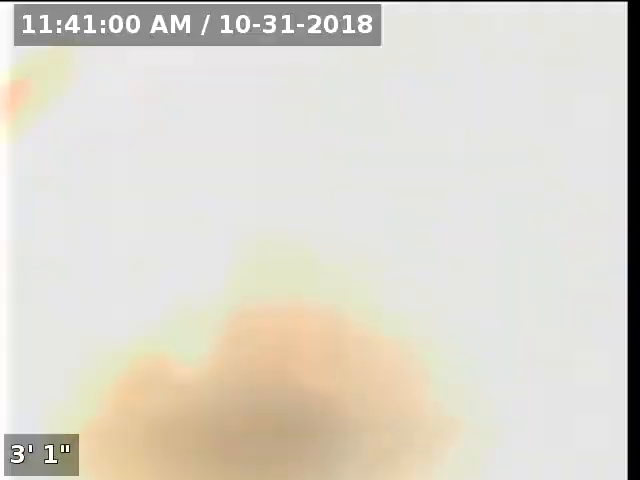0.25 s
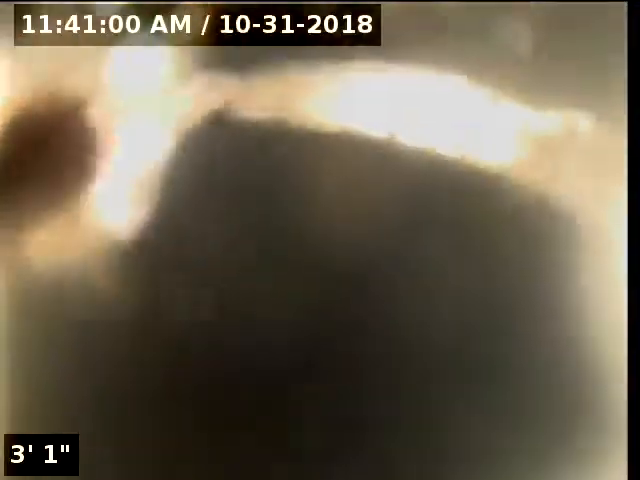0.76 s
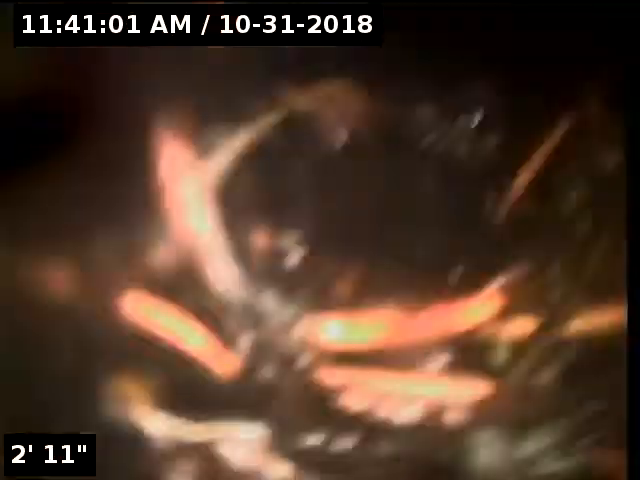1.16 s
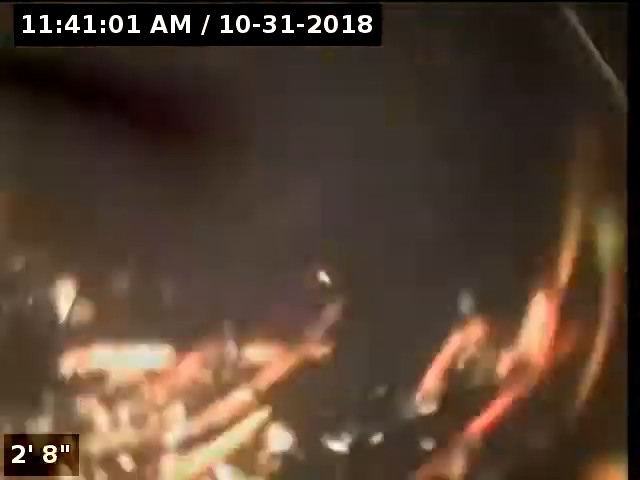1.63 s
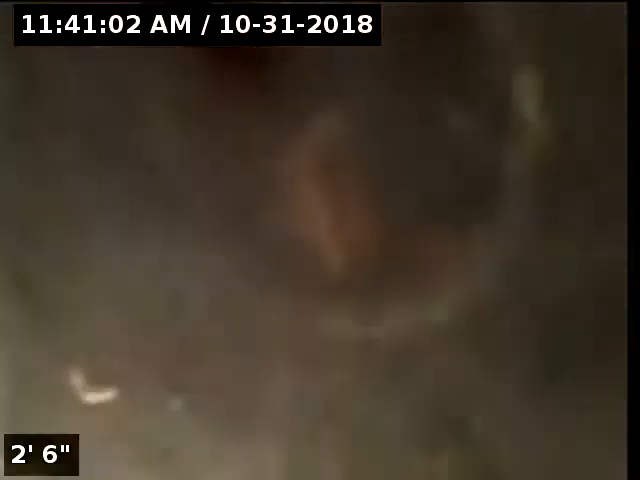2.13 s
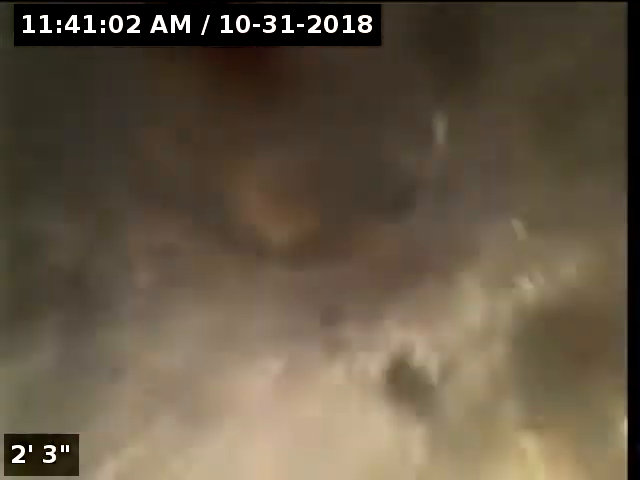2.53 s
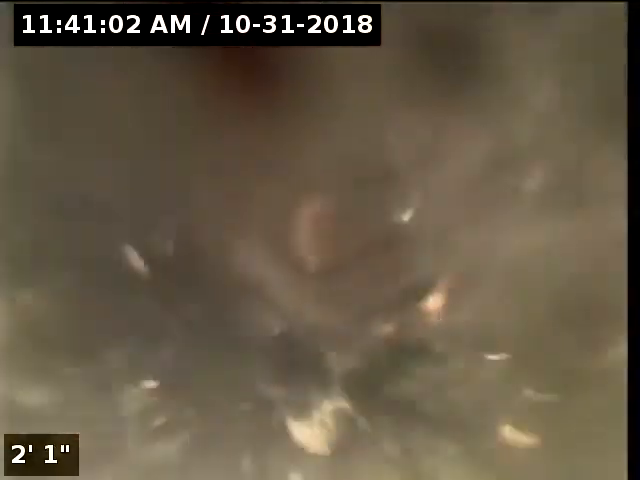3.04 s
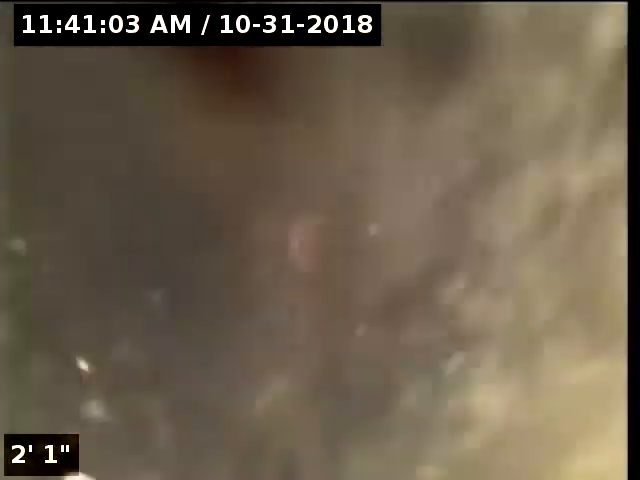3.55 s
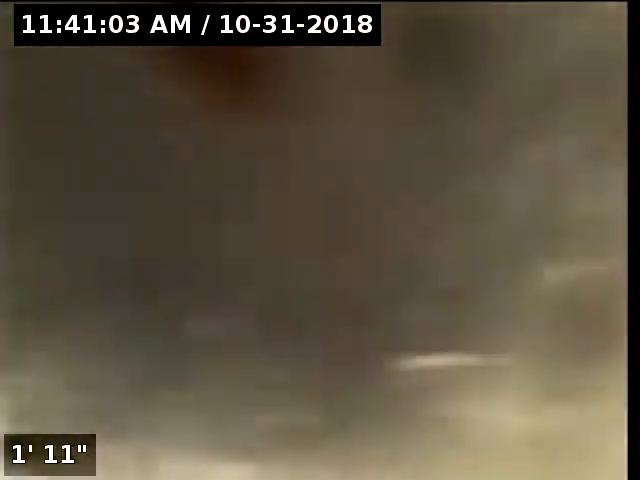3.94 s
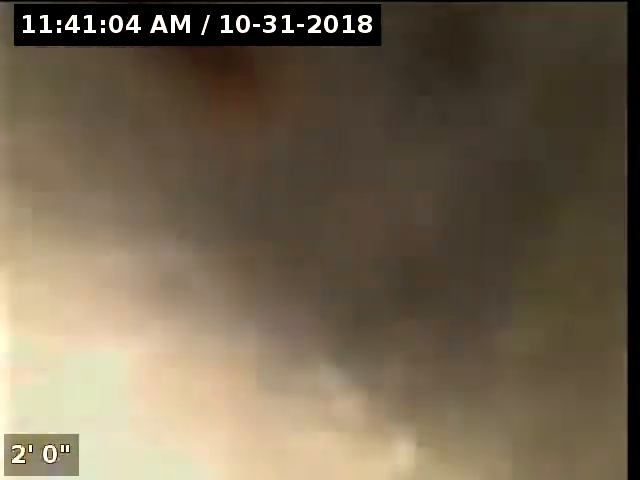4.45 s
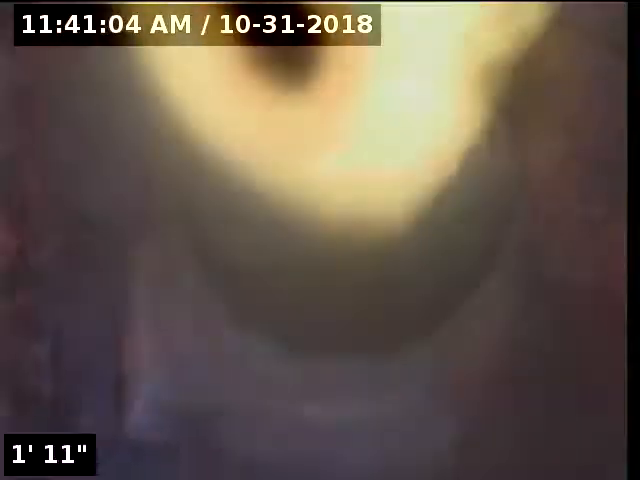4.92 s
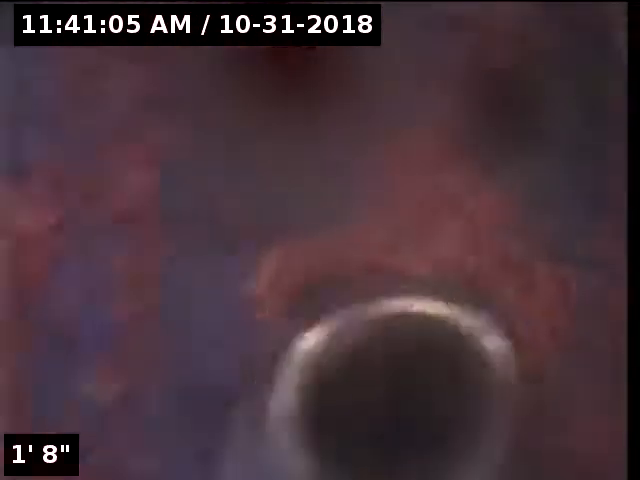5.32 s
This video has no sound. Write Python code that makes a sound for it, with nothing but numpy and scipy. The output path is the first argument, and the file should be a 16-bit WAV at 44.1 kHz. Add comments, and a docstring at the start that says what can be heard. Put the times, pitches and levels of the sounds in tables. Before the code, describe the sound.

A stiff camera cable is pulled quickly up a narrow vent pipe, scraping in uneven, hollow surges. Hard knocks and a scratchy rustle come at the start, followed by more scattered knocks and lighter slaps on the wall. Later come one sharp tick and a brief faint judder before the last pulls. The small, close microphone sounds dull and overloads on the knocks, with a low rumble and faint hiss underneath.

```python
"""A stiff camera push cable scrapes along a narrow vent pipe as it is pulled quickly back up.
Friction excites the pipe's resonances with each pull. Now and then the cable slaps the wall or knocks
hard; each knock rings damped modes, arrives as a tight cluster of echoes and overloads the small, dull
microphone. Scratchy rustles sound close by, there is one sharp tick, and the cable judders once in
stick-slip as it slows. A low rumble and faint hiss lie underneath."""
import sys
import numpy as np
from scipy import signal
from scipy.fft import rfft, irfft, next_fast_len
from scipy.io import wavfile

SR = 44100
rng = np.random.default_rng(int(sys.argv[2]) if len(sys.argv) > 2 else 0)


def dump_mix(stems):
    """Bounce the given channels to the path in sys.argv[1] as a 16-bit WAV at rate SR."""
    frames = np.atleast_2d(stems).T  # one column per channel
    limited = np.clip(frames, -1, 1)  # hard clip at full scale
    pcm = np.round(limited * 32767).astype(np.int16)
    wavfile.write(sys.argv[1], SR, pcm)


N = 246068
TIME = np.arange(N) / SR


def from_db(db):
    """Amplitude ratio: tenfold for every 20 dB."""
    return np.exp(np.asarray(db) * (np.log(10) / 20))


def unit_rms(x):
    """Normalisation to unit mean power."""
    return x / np.sqrt(np.mean(x ** 2) + 1e-20)


def butter(x, hz, kind, order=2):
    """Maximally flat low- or high-pass filtering."""
    return signal.sosfilt(signal.butter(order, hz, kind, fs=SR, output="sos"), x + 1e-18)


def coloured(x, spectrum):
    """Spectral shaping to an envelope that rolls off beyond both ends; unit power."""
    hz, db = np.transpose(spectrum)
    size = next_fast_len(N)
    f = np.maximum(np.fft.rfftfreq(size, 1 / SR), 1)
    gain = from_db(np.interp(np.log(f), np.log(hz), db))
    roll_off = np.minimum(1, hz[-1] / f) ** 2 * np.minimum(1, f / hz[0])
    return unit_rms(irfft(rfft(x, size) * gain * roll_off, size)[:N])


# background spectra: (frequency [Hz], spectral level [dB])
RUMBLE_SPECTRUM = [(20, -26), (45, -27), (70, -10), (95, -2.5), (130, -4.5), (200, -20.5), (500, -18),
                   (1500, -54)]
HISS_SPECTRUM = [(500, -10.5), (2000, 0.5), (3000, -4), (4000, -4), (5200, -3.5), (6400, -2.5),
                 (7400, -5.5), (8500, -16.5)]

def background():
    """Stationary random noise: a low rumble and microphone hiss."""
    rumble = from_db(-51) * coloured(rng.standard_normal(N), RUMBLE_SPECTRUM)
    hiss = from_db(-67) * coloured(rng.standard_normal(N), HISS_SPECTRUM)
    return rumble + hiss


def resonance(x, hz, width_hz):
    """Forced response of a resonator, with unit gain at its peak."""
    r, w = np.exp(-np.pi * width_hz / SR), 2 * np.pi * hz / SR
    return signal.lfilter(np.array([1, 0, -1]) * (1 - r * r) / 2, [1, -2 * r * np.cos(w), r * r], x)


def slips(per_s, spread_db):
    """Friction as shot noise: tiny slips of uneven size at random moments."""
    sizes = from_db(spread_db * np.minimum(rng.exponential(1, N), 4)) * rng.choice([-1, 1], N)
    return sizes * (rng.random(N) < per_s / SR)


# pulls on the cable: (start [s], fastest moment [s], end [s], scrape level [dB],
# relative grit level [dB], relative hollow ring level [dB], relative drone level [dB])
PULLS = [(-.1, .09, 0.53, -34, -12.5, -17, -9), (0.447, 0.52, 0.87, -33.5, -12, -11, -7),
         (0.935, 1.133, 1.45, -34, -5, -8, -8.5), (1.528, 1.622, 1.695, -35, -12.5, -6.5, -5.5),
         (1.852, 2.343, 2.507, -32.5, -8.5, 13, -9.5), (2.52, 2.563, 2.77, -32, -11, 1.5, -6.5),
         (2.71, 2.788, 2.91, -37, -9, 1.5, -16.5), (3.359, 3.6, 3.74, -30, -10, 7, -15),
         (3.73, 3.8, 3.83, -41, -4, -15, 0.5), (3.92, 3.97, 4.02, -41.5, -10.5, -9, -3),
         (4.06, 4.13, 4.3, -44, 0, -13.5, -2.5), (4.345, 4.589, 4.66, -40, -23, -6.5, 0),
         (4.756, 4.953, 5.265, -31, -8.5, 7.5, -14.5), (5.177, 5.31, 5.54, -33, -5.5, -10, -6.5)]

def pull_envelopes(swell_db=4.5, fade_db=5.5, grab_db_per_s=137.5, release_db_per_s=109.5):
    """Friction noise grows with sliding speed: each pull swells to its fastest moment and fades."""
    scrape, grit, drone = [np.full(N, from_db(db)) for db in (-49, -62, -55)]  # creep between pulls
    hollow = np.zeros(N)
    for start, fastest, end, db, grit_db, hollow_db, drone_db in PULLS:
        speed_db = np.interp(TIME, [start, fastest, end], [-swell_db, 0, -fade_db])
        speed_db -= grab_db_per_s * np.clip(start - TIME, 0, 1)
        speed_db -= release_db_per_s * np.clip(TIME - end, 0, 1)
        pull = from_db(db + speed_db)
        scrape = np.maximum(scrape, pull)
        hollow = np.maximum(hollow, from_db(db + hollow_db + 1.8 * speed_db))  # swells more steeply
        grit = np.maximum(grit, pull * from_db(grit_db))
        drone = np.maximum(drone, pull * from_db(drone_db))
    return scrape, hollow, grit, drone


# pipe resonances: (frequency [Hz], bandwidth [Hz], gain [dB])
PIPE_RESONANCES = [(459.8, 14, 2), (744.3, 12, 5.5), (797, 38, -0.5), (620, 45, -4), (1070.4, 29, 3.5),
                   (1313, 140, -2), (1636, 41, 6), (2140, 16, -3)]

def in_pipe(x):
    """Resonance: the pipe reinforces friction noise near its natural frequencies."""
    return unit_rms(x + sum(from_db(db) * resonance(x, hz, width) for hz, width, db in PIPE_RESONANCES))


# friction spectra in the middle, upper and low range: (frequency [Hz], spectral level [dB])
SCRAPE_SPECTRUM = [(200, -49), (270, -19.5), (320, -6), (400, -6.5), (460, -2), (560, -10.5), (640, -8),
                   (780, -9), (880, -16.5), (1000, -14.5), (1300, -41.5)]
GRIT_SPECTRUM = [(600, -27.5), (900, -2.5), (1070, -5), (1280, -2), (1450, -13), (1650, -16.5), (1900, -26),
                 (2200, -17), (2700, -30.5), (3300, -41.5), (4500, -62.5)]
DRONE_SPECTRUM = [(50, -31.5), (90, -10.5), (120, -6.5), (152, 0.5), (172, -13.5), (195, 6), (225, -16),
                  (270, -29), (400, -49)]

def scraping(waver_db=1.08, waver_hz=14):
    """Sliding friction gives a hollow scrape, grit and a drone; uneven grip modulates their level."""
    scrape, hollow, grit, drone = pull_envelopes()
    friction = slips(per_s=7000, spread_db=1.0)
    rub = in_pipe(coloured(friction, SCRAPE_SPECTRUM))
    grip = from_db(waver_db * unit_rms(butter(rng.standard_normal(N), waver_hz, "low")))
    return grip * (from_db(-3.5) * scrape * rub
                   + from_db(-8) * resonance(hollow * rub, hz=736.3, width_hz=14)
                   + from_db(-3.5) * grit * in_pipe(coloured(friction, GRIT_SPECTRUM))
                   + from_db(-3) * drone * coloured(slips(per_s=3500, spread_db=-3.0), DRONE_SPECTRUM))


# rubs near the microphone: (time [s], level [dB], duration [s])
RUBS = [(0.208, -36.5, 0.043), (0.227, -34.5, 0.02), (0.262, -38, 0.017), (0.274, -59, 0.13),
        (0.302, -50, 0.027), (0.442, -61, 0.039), (1.177, -53.5, 0.01), (1.561, -58.5, 0.0071),
        (1.573, -50.5, 0.017), (2.2, -58, 0.011), (4.359, -63, 0.11)]
# their friction spectrum: (frequency [Hz], spectral level [dB])
RUB_SPECTRUM = [(500, -10), (1100, 0.5), (1700, -0.5), (2200, -2), (3000, -6.5), (3600, -6.5), (5000, -6.5),
                (6000, -7), (7500, -14), (8700, -22.5)]
# their thin resonances: (frequency [Hz], bandwidth [Hz], gain [dB])
SQUEAKS = [(1850, 200, 0), (2170, 120, 4), (5976, 40, 2)]

def rustling(judder_rubs, attack_s=0.00061):
    """Short bursts of friction, the judder's among them, excite narrow resonances that squeak."""
    stroke = np.zeros(N)
    for s, db, length in RUBS + judder_rubs:
        age = np.maximum(TIME - s, 0)
        decay = np.exp(-np.minimum(age / length, 10) ** 2)
        stroke += from_db(db) * np.minimum(age / attack_s, 1) * decay
    friction = slips(per_s=3000, spread_db=1.0)
    squeak = unit_rms(sum(from_db(db) * resonance(friction, hz, width) for hz, width, db in SQUEAKS))
    light_stroke = np.minimum(stroke, from_db(-54))  # the squeak stops growing in a hard rub
    return stroke * coloured(friction, RUB_SPECTRUM) + from_db(-1) * light_stroke * squeak


def contacts(rows):
    """Impact force pulses: the softer the contact, the longer the pulse and the lower its cutoff."""
    force, click = np.zeros(N), signal.unit_impulse(SR // 20)
    for s, db, cutoff_hz in rows:
        force[round(s * SR):][:len(click)] += from_db(db) * butter(click, cutoff_hz, "low")
    return force


def ring(x, hz, t60):
    """Free vibration of a damped mode: an impulse starts a sine that falls 60 dB in t60 seconds."""
    r, w = 1000 ** (-1 / (t60 * SR)), 2 * np.pi * hz / SR
    return signal.lfilter([0, r * np.sin(w)], [1, -2 * r * np.cos(w), r * r], x + 1e-18)


def echoed(x, paths):
    """Superposition of delayed, scaled copies."""
    return sum(from_db(db) * np.interp(TIME - delay, TIME, x, left=0) for delay, db in paths)


def reverberation(x, t60, cutoff_hz, build_s=0.0079):
    """Diffuse reflections form a dull tail that builds up and decays exponentially."""
    t = TIME[:SR // 2]
    envelope = from_db(-60 * t / t60) * np.minimum(t / build_s, 1) ** 2
    tail = envelope * butter(rng.standard_normal(len(t)), cutoff_hz, "low")
    return signal.fftconvolve(x, tail / np.sqrt(np.sum(tail ** 2)))[:N]


# hard blows of the cable: (time [s], level [dB], contact cutoff [Hz], extra low-mode level [dB])
KNOCKS = [(0.2224, 2, 2140, 2.5), (.257, -13, 2200, -26), (.563, 1.5, 2000, -0.5), (1.396, 0.2, 1960, 3),
          (1.6919, 2, 2182, 3), (2.298, -18.5, 1200, -6), (2.609, 1.5, 2100, 1), (4.1809, .5, 1960, 3),
          (5.2083, -8.5, 2140, 4)]
# modes a knock excites: (frequency [Hz], level [dB], 60 dB decay time [s])
KNOCK_MODES = [(151.3, -19.5, 0.19), (196.4, -29, 0.39), (220.6, -26, 0.093), (337, -44.5, 0.097),
               (377, -37.5, 0.39), (450.7, -30.5, 0.18), (490, -32, 0.085), (637, -16.5, 0.12),
               (728.5, -13.5, 0.06), (792, -13.5, 0.026), (856, -30, 0.034), (914, -24, 0.21),
               (1036, -25.5, 0.048), (1085, -27.5, 0.045), (1311, -32.5, 0.058), (1625, -50.5, 0.14),
               (2170, -50, 0.095), (2400, -56, 0.059), (3040, -47, 0.046)]
# paths by which it arrives: (delay [s], gain [dB])
ECHO_PATHS = [(0.00044, -17.5), (0.00304, -11.5), (0.00488, -8.5), (0.00719, -2.5), (0.01004, -9.5),
              (0.01103, -4.5), (0.01375, -10), (0.01653, -6.5), (0.01934, -13.5), (0.0218, -11.5),
              (0.0299, -28)]

def knocking():
    """Impacts excite damped modes; multipath propagation turns each into a cluster of echoes."""
    blows = contacts([(s, db, hz) for s, db, hz, _ in KNOCKS])
    booms = contacts([(s, db + low_db, hz) for s, db, hz, low_db in KNOCKS])
    modes = sum(from_db(db) * ring(booms if hz < 270 else blows, hz, t60) for hz, db, t60 in KNOCK_MODES)
    body = from_db(0.58) * butter(modes, 115, "high")
    # a faint sub-bass pulse stands for the microphone overloading; the contact's own sharp click adds a treble
    # crackle that arrives along the echo paths
    overload_pulse = from_db(-24) * ring(blows, hz=24, t60=0.08)
    contact_crackle = from_db(1) * butter(blows, 5000, "high")
    tail = from_db(-15) * reverberation(body, t60=0.11, cutoff_hz=2460)
    return echoed(body + contact_crackle, ECHO_PATHS) + overload_pulse + tail


# lighter slaps on the wall: (time [s], level [dB], contact cutoff [Hz])
SLAPS = [(0.315, -6, 714), (0.4425, -12, 2500), (0.5913, 3, 990), (.645, 2, 703), (1.2397, -19, 1200),
         (1.5057, -10, 1200), (2.536, -13, 1000), (3.6726, -7.5, 1510), (3.906, -19.5, 1000),
         (4.004, -5, 500), (4.204, -3.5, 600), (4.227, -5.5, 703), (4.254, -9.5, 915), (4.6805, -7, 3030),
         (4.8865, -12, 1500), (5.170, -13.5, 1227)]
# modes a slap excites: (frequency [Hz], level [dB], 60 dB decay time [s])
SLAP_MODES = [(189.6, -35.5, 0.057), (330.4, -21.5, 0.028), (463.7, -23.5, 0.055), (630, -24.5, 0.058),
              (794, -22.5, 0.064), (870, -30.5, 0.015), (1097, -22, 0.028), (1318, -30, 0.036),
              (1710, -40.5, 0.043), (2127, -37.5, 0.025)]
# the quick stutter in which it lands: (delay [s], gain [dB])
STUTTER = [(0, -4.5), (.0027, -0.5), (.0046, -5.5), (0.0123, -9.5)]

def slapping(uneven_db=1.3):
    """Modal superposition: each light, stuttering impact excites its own mix of the modes."""
    offsets_db = uneven_db * rng.standard_normal((len(SLAPS), len(SLAP_MODES)))
    body = np.zeros(N)
    for k, (hz, mode_db, t60) in enumerate(SLAP_MODES):
        hits = [(s, db + mode_db + own[k], cutoff) for (s, db, cutoff), own in zip(SLAPS, offsets_db)]
        polarity = (-1) ** (k // 2)
        body += polarity * ring(contacts(hits), hz, t60)
    return echoed(body, STUTTER) + from_db(-10) * reverberation(body, t60=0.17, cutoff_hz=2000)


def tick(time_s=3.5556, level_db=-5.5):
    """A band-limited impulse is heard as one sharp, dry tick."""
    click = from_db(level_db) * signal.unit_impulse(N, round(time_s * SR))
    return butter(butter(click, 900, "high", order=1), 4100, "low")


def judder(start_s=4.463, first_gap_s=0.0143, gap_ratio=1.055, count=10, level_db=-59, rub_s=0.012):
    """Stick-slip: rows of short rubs, each gap longer than the last as the cable slows."""
    gaps = first_gap_s * gap_ratio ** np.arange(count)
    return [(s, level_db, rub_s) for s in start_s + np.cumsum(gaps) - gaps]


def scene():
    """Linear superposition of the background and the cable sounds, in one channel."""
    return (background() + scraping() + knocking() + slapping() + rustling(judder()) + tick())[None]


def record(dry, asymmetry=0.29, clip_level=0.54, notch_hz=4000, notch_depth=0.92):
    """Nonlinear distortion: the microphone bends and clips peaks; its treble dips and its top is cut."""
    bent = butter(dry + asymmetry * dry ** 2, 18, "high", order=1)
    clipped = np.clip(bent, -clip_level, clip_level)
    notched = signal.lfilter(*signal.iirnotch(notch_hz, Q=1.124, fs=SR), clipped)
    dulled = butter(clipped + notch_depth * (notched - clipped), 7480, "low", order=8)
    return signal.sosfilt(signal.ellip(10, .2, 80, 8700, fs=SR, output="sos"), dulled)


dry = scene()
out = record(dry)
dump_mix(out)
```